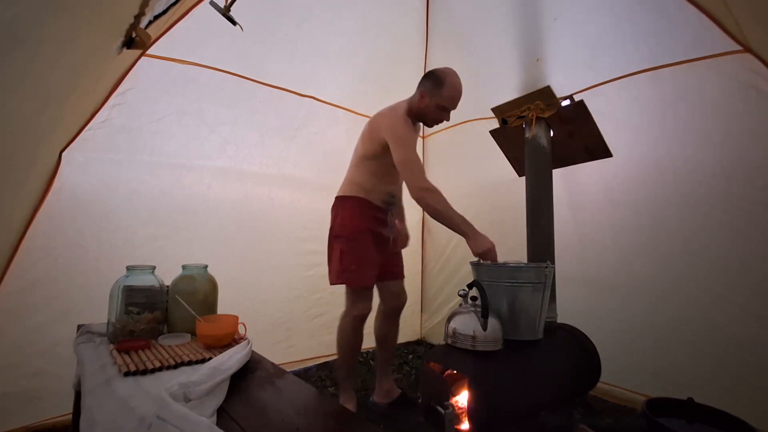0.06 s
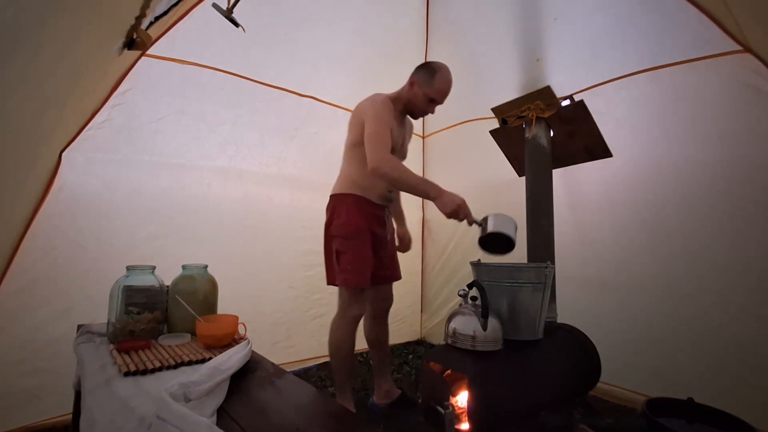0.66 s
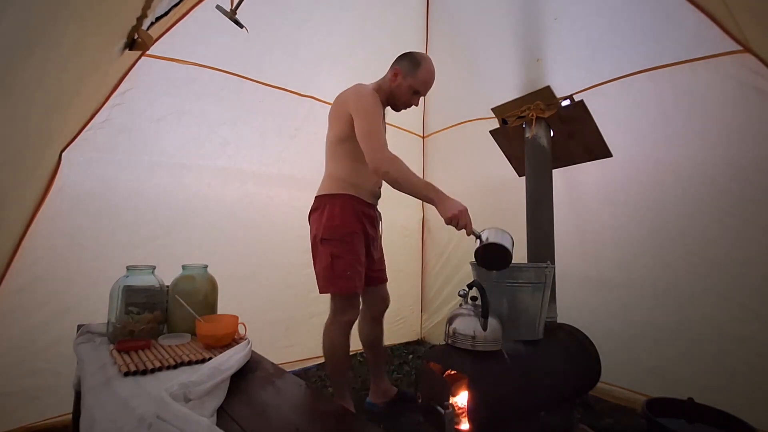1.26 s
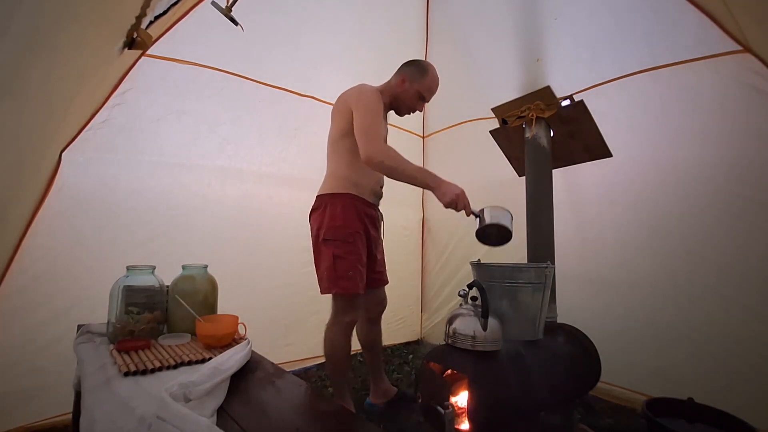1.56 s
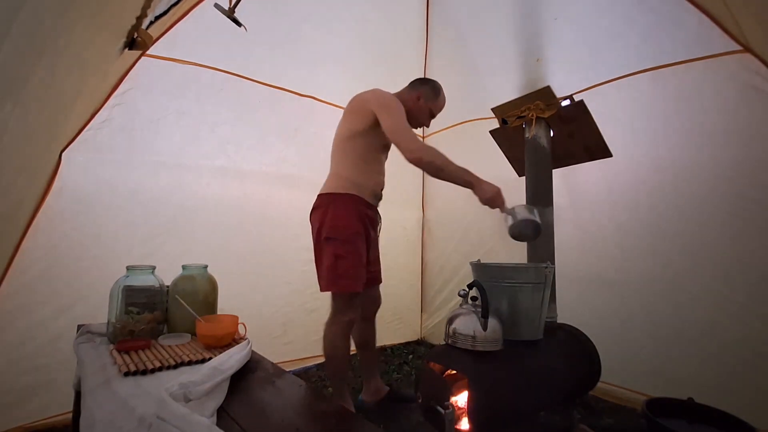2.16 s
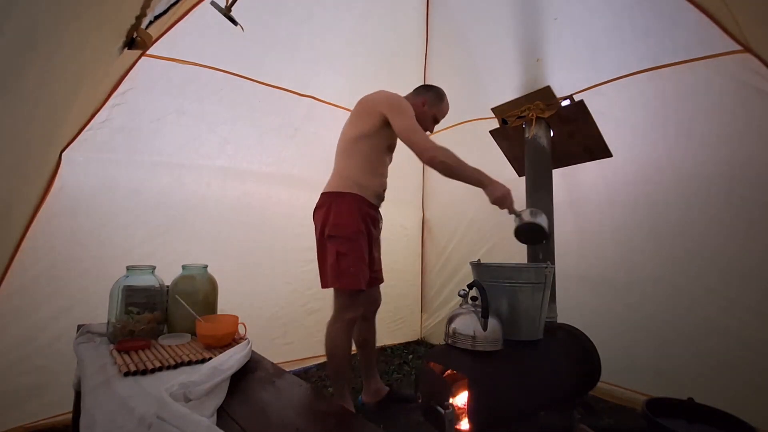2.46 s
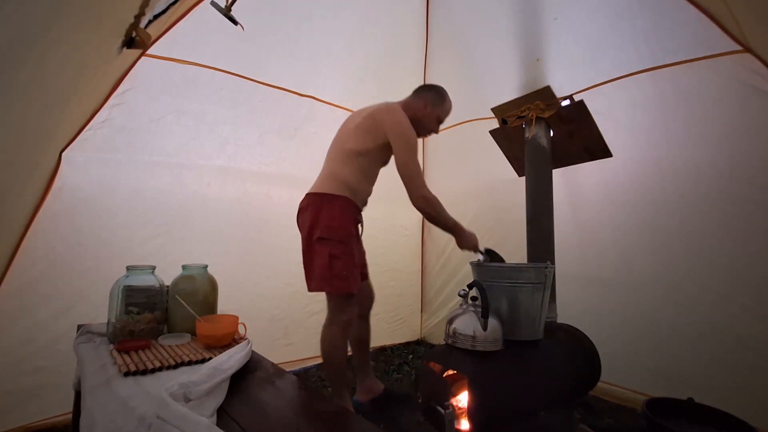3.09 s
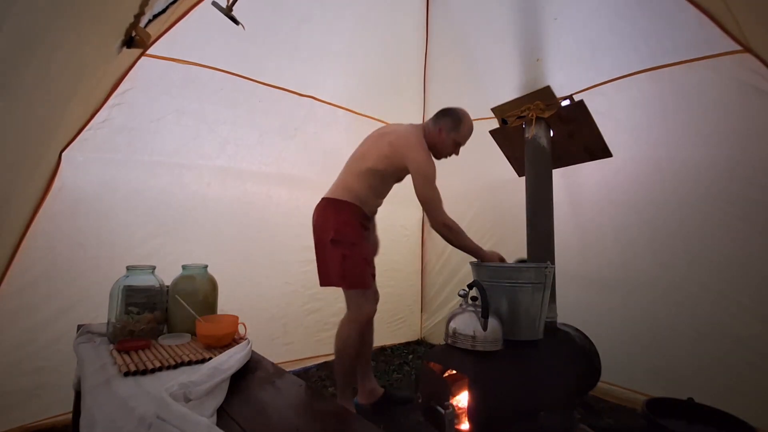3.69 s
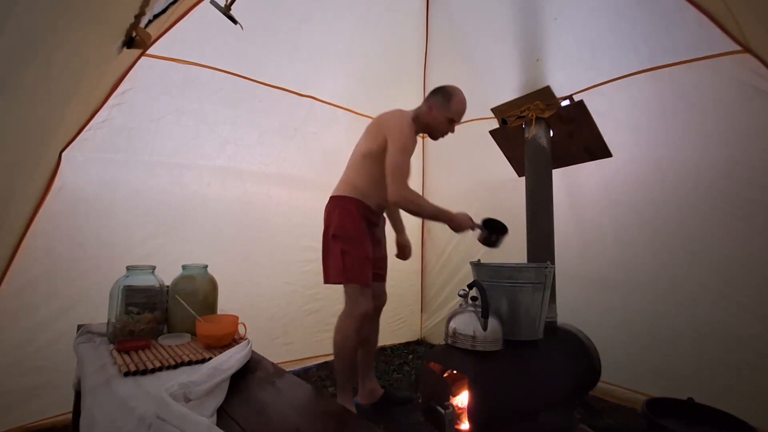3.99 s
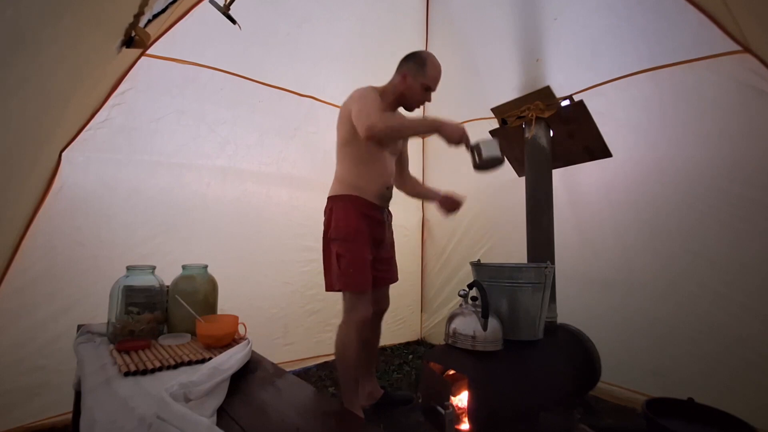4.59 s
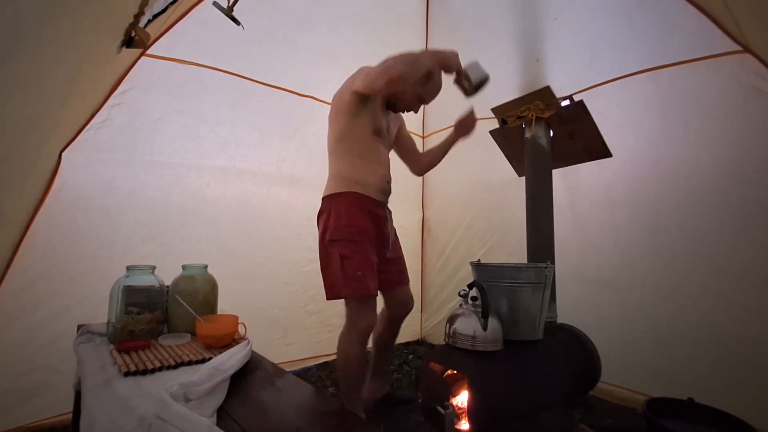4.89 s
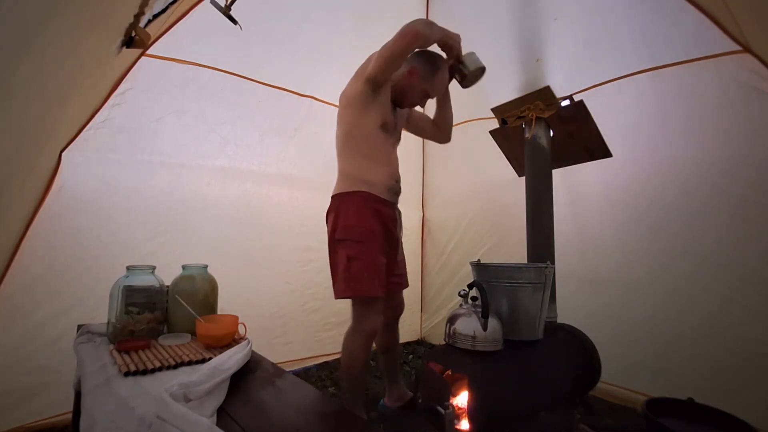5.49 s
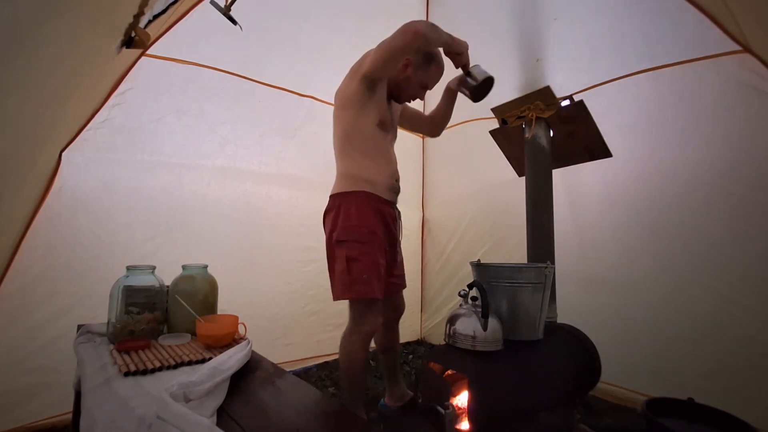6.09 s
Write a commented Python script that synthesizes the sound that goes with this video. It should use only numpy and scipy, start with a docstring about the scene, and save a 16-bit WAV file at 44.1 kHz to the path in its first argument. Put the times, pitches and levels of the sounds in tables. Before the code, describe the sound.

A wood fire drones and flutters low in a stove flue throughout, inside a tent with almost no echo. At the start a ladle glugs softly in a bucket, and drips tick until 0.5 seconds. Water touches the hot steel at about 0.9 seconds and flares at 1.2 into a loud, frying hiss that eases after 1.8, leaving beads finely crackling. A softer hiss builds from 2 seconds, with a very faint wavering steam note beneath it. At 2.6 a sharp splash crackles, drums briefly on the metal and spits until about 2.9. The third pour swells at 3.5 seconds into a bright, full hiss, holds until just past 4, then fades slowly to a thin sizzle. From 5.6 to 6.2 seconds, poured water plops and splats softly on the wet floor. The hiss is wide and leans right, while the rumble stays central.

```python
"""Water flashes into steam on a hot barrel stove, ladled on in three spills inside a sauna tent.
Tiny bursting droplets make a fine hiss; where the water lies deep it fries and boils more coarsely.
Slops drum on the steel, trapped steam spits and stray beads skitter. Underneath, the fire drones in
the flue. The ladle glugs and drips at the start; at the end water splashes softly over the bather."""
import sys
import numpy as np
from scipy import signal
from scipy.fft import rfft, irfft, next_fast_len
from scipy.io import wavfile
from scipy.ndimage import uniform_filter1d

SR = 44100
rng = np.random.default_rng(int(sys.argv[2]) if len(sys.argv) > 2 else 0)


def unload_audio(sound):
    """Save the sound as a 16-bit wav file, at the path given as the first command line argument."""
    columns = np.transpose(np.atleast_2d(sound))
    # keep every value between -1 and 1, then stretch to whole-number steps
    steps = np.round(np.clip(columns, -1, 1) * 32767)
    wavfile.write(sys.argv[1], SR, steps.astype(np.int16))


N = 279902
TIME = np.arange(N) / SR
FFT_SIZE = next_fast_len(N, real=True)
BIN_HZ = np.maximum(np.fft.rfftfreq(FFT_SIZE, 1 / SR), 1)

# tone of fine spray, for the first two spills and the drips: freq_hz, gain_db
HISS_EQ = [(1500, -20), (3000, -47), (5000, -34), (6200, -7.5), (7700, 0.5), (9000, -2), (10500, 0.5),
           (12000, 5.5), (13500, 5), (15800, 1.5)]
# tone of frying water, for the first two spills and the slops: freq_hz, gain_db
FRY_EQ = [(1200, -23), (2200, -5.5), (2600, 1.5), (2950, -3), (3500, 6.5), (3950, 5.5), (4700, 4),
          (5500, 5.5), (6200, -1), (7200, 4), (12000, -1)]


def spills(crossfade_at_s=3.62, crossfade_s=0.13):
    """Two spills sizzle on one patch of the stove; the third wets another, with its own colour."""
    # boiling on the first patch: freq_hz, gain_db
    boil_eq = [(60, 4), (160, 3), (330, -17), (480, 3.5), (620, 6.5), (800, 1.5), (1050, -2.5), (1400, 6.5),
               (1700, 1.5), (2000, -3.5), (2600, -6), (4000, -10)]
    # hiss, frying and boiling of the third spill: freq_hz, gain_db
    third_hiss_eq = [(1500, -52), (3000, -67), (5000, -5.5), (6500, -8), (8000, 4), (9200, 3), (10600, 5),
                     (11900, 9), (13200, 6.5), (14200, 9), (15800, 4.5)]
    third_fry_eq = [(1200, -47), (2100, -30), (2600, -14), (2900, -11), (3500, -5), (4300, 1.5),
                    (5300, -2.5), (6000, -5), (8000, 1.5), (12000, -27)]
    third_boil_eq = [(150, 1.5), (350, -9.5), (600, 1), (1050, -11.5), (1280, -1.5), (1600, -1.5),
                     (1900, -6), (2600, -1.5), (4000, -21)]
    first_two = sizzle(HISS_EQ, FRY_EQ, boil_eq)
    third = sizzle(third_hiss_eq, third_fry_eq, third_boil_eq)
    blend = np.clip((TIME - crossfade_at_s) / crossfade_s + .5, 0, 1)
    return np.sqrt(1 - blend) * first_two + np.sqrt(blend) * third


def sizzle(hiss_eq, fry_eq, boil_eq):
    """Thin water hisses, deeper water fries and boils; more water means more bursts a second."""
    hiss_db, fry_db, boil_db = wetting()
    pops_per_s = 12000 * undb(.6 * (hiss_db + 30.5))
    sputter_db = 0.2 * wander(25) + 0.2 * wander(140)
    fine_pops = unit(pops(pops_per_s, 3.3) + undb(5.5) * noise())
    hiss = undb(hiss_db) * colour(fine_pops, hiss_eq)
    coarse_pops = unit(pops(pops_per_s / 2, 1.65, spots=3) + undb(-8) * noise())
    fry = undb(fry_db) * colour(coarse_pops, fry_eq)
    boil = undb(boil_db) * colour(pops(pops_per_s / 2, 2.36), boil_eq)
    return undb(sputter_db) * (hiss + fry + boil)


def wetting(spread_s=0.2, film_db=-14.5, film_drying_db_per_s=3):
    """Hiss, fry and boil levels in dB: each gush rises, holds, then dries down to a lingering film."""
    # gushes onto the steel: start_s, rise_s, length_s, hiss_db, drying_db_per_s,
    # fry_offset_db, boil_offset_db
    gushes = [(0.872, 0.06, 0.29, -43.5, 24, -14.5, -20), (1.192, 0.06, 0.54, -29, 34, -8, -15.5),
              (1.202, 0.02, 0.04, -42.5, 38, -17.5, -6.5), (1.325, 0.1, 0.19, -34.5, 40, -1, -8),
              (1.99, 0.27, 0.99, -42, 37, -7, -17.5), (2.622, 0.028, 0.2, -32, 24.5, -7.5, -17.5),
              (3.52, 0.22, 0.54, -27, 13, -11, -23.5), (3.654, 0.12, 0.026, -39, 37, -0.5, -6)]
    power = np.full((3, N), 1e-12)
    for start_s, rise_s, length_s, hiss_db, drying_db_per_s, fry_offset_db, boil_offset_db in gushes:
        age = np.maximum(TIME - start_s, 0)
        since_end = np.maximum(age - length_s, 0)
        film = undb(film_db - film_drying_db_per_s * since_end)
        water = np.minimum(age / rise_s, 1) * np.hypot(undb(-drying_db_per_s * since_end), film)
        # fresh water lies deep: less hiss, more frying and boiling until it spreads thin
        fresh = np.exp(-age / spread_s)
        offsets_db = np.array([-6.5 * fresh, fry_offset_db + 3 * fresh, boil_offset_db + 4 * fresh])
        power += (water * undb(hiss_db + offsets_db)) ** 2
    return 10 * np.log10(power)


def slops():
    """A slop flashes into a dense crackle, fries for an instant and drums on the steel shell."""
    # water hitting the steel: start_s, flash_db, decay_s, drum_offset_db, fry_offset_db
    hits = [(2.607, -18.5, 0.018, -6, -4.5), (2.618, -30, 0.17, -16.5, -3), (2.635, -40, 0.017, -5, -3),
            (2.668, -26.5, 0.012, -7, -5), (2.68, -31, 0.023, -14, -2), (2.72, -26.5, 0.005, -15, 0.5),
            (2.752, -42, 0.025, -5, 0)]
    # tone of the flash into steam: freq_hz, gain_db
    flash_eq = [(300, -25), (500, -4), (1000, 0), (2100, -35), (3300, -15), (5000, -10), (6500, -14),
                (7900, 11), (9600, 4.5), (12600, 12.5), (16000, 6)]
    # resonances of the shell: pitch_hz, width_hz, gain_db
    steel_modes = [(1280, 55, -2), (1456, 60, 4), (1535, 60, 4.5), (1658, 55, 5), (1781, 45, 3.5),
                   (1870, 60, -3), (2360, 210, -14)]
    flash = drum = fry = 0
    for start_s, flash_db, decay_s, drum_offset_db, fry_offset_db in hits:
        hit = undb(flash_db) * burst(start_s, decay_s, rise_s=0.0014)
        flash += hit
        drum += undb(drum_offset_db) * hit
        fry += undb(fry_offset_db) * hit
    crackle = colour(flash * pops(20000, 1.5), flash_eq)
    return crackle + colour(fry * noise(), FRY_EQ) + ring(drum * noise(), steel_modes)


def spits():
    """Trapped steam spits in short rasps, each through a gap of its own pitch, over a low sputter."""
    # escapes of steam: start_s, pitch_hz, width_hz, level_db, decay_s
    escapes = [(1.216, 3820, 2220, -37.5, 0.066), (1.235, 6800, 3000, -31, 0.008),
               (2.645, 2580, 700, -34, 0.04), (2.662, 560, 260, -45, 0.019),
               (2.723, 4970, 900, -28.5, 0.024), (2.742, 4840, 1100, -47, 0.035),
               (2.752, 630, 382, -41, 0.035), (2.778, 4220, 867, -25, 0.0045),
               (2.799, 3340, 300, -27.5, 0.013), (2.805, 4570, 900, -34, 0.016),
               (2.865, 660, 200, -45.5, 0.034), (3.764, 1290, 200, -41, 0.024),
               (3.99, 1330, 300, -41.5, 0.013)]
    rasps = sputter = 0
    crackle = pops(8000, 2.7, spots=3)
    for start_s, pitch_hz, width_hz, level_db, decay_s in escapes:
        puff = undb(level_db) * burst(start_s, decay_s, rise_s=.002) * crackle
        rasps += ring(puff, [(pitch_hz, width_hz, 0)])
        sputter += puff
    return rasps + undb(-19) * ring(sputter, [(680, 290, 0)])


def beads(start_s=1.147, rise_s=0.078, level_db=-44, drying_db_per_s=1.3):
    """Beads left by the first spill skitter on the steel with a fine crackle, slowly drying."""
    # tone of the crackle: freq_hz, gain_db
    bead_eq = [(1500, -8), (2050, -4), (2350, -2), (2680, 8), (2980, -3), (3300, 2.5), (3900, 5),
               (4700, -37), (5400, 0.5), (6300, 3.5), (7600, 1.5), (9000, -2.5), (12000, 3.5), (15800, 2.5)]
    age = np.maximum(TIME - start_s, 0)
    skitter_db = 1.1 * wander(160)
    envelope = undb(level_db - drying_db_per_s * age + skitter_db) * np.minimum(age / rise_s, 1)
    return envelope * colour(pops(4000, 1.4), bead_eq)


def stove(drone_db=-48.5, rumble_db=-55, flutter_db=-54, calming_db_per_s=0.6):
    """Flames flutter and drive the flue's low drone; steam whoomphs and hot pots simmer faintly."""
    # swells (+) and lulls (-) of the low drone and flutter, from the fire's draught and from steam
    # whoomphing after a spill: centre_s, half_width_s, drone_step_db, flutter_step_db
    swells = [(0.232, 0.18, -3.5, 1), (0.55, 0.088, 7, 5.5), (0.68, 0.063, -1.5, 2.5),
              (0.84, 0.07, 5, -0.5), (1.17, 0.2, 1, 5), (1.56, 0.067, 10, 7.5), (2.03, 0.059, -6, 4),
              (2.3, 0.36, 2, 0), (2.89, 0.078, 8.5, 0.5), (4.55, 0.2, -5.5, 0.5), (6.2, 0.2, 1.5, 3)]
    # resonances of the flue: pitch_hz, width_hz, gain_db
    flue_modes = [(45.6, 3.8, 1.5), (61.4, 6.4, 1), (72, 8, -3.5), (93.8, 11.4, 3.5)]
    # tone of the rumble, the flutter and the pots: freq_hz, gain_db
    rumble_eq = [(10, -23), (35, -2.5), (60, 7), (110, -15), (145, -1.5), (180, -7), (280, -12), (400, -15),
                 (800, -34)]
    flutter_eq = [(150, -6.5), (330, -7.5), (500, -0.5), (620, 1), (710, 4), (900, 1.5), (1100, -2.5),
                  (1400, -11.5), (1900, -26), (2400, -42)]
    simmer_eq = [(1500, 0.5), (2400, -21), (3100, 3.5), (3500, 0), (4300, 0), (5300, -3.5), (6600, -2),
                 (7400, 6), (8800, -3.5), (10200, -1), (15000, -15)]
    drone_ride_db = -0.15 * wander(11)
    flutter_ride_db = -calming_db_per_s * TIME
    for centre_s, half_width_s, drone_step_db, flutter_step_db in swells:
        swell = np.exp(-((TIME - centre_s) / half_width_s) ** 2)
        drone_ride_db += drone_step_db * swell
        flutter_ride_db += flutter_step_db * swell
    draught = colour(noise(), [(20, 3), (45, 6.5), (100, 5), (200, -3.5)])
    drone = undb(drone_db + drone_ride_db) * unit(ring(draught, flue_modes))
    rumble = undb(rumble_db + 0.43 * drone_ride_db) * colour(noise(), rumble_eq)
    flutter = undb(flutter_db + flutter_ride_db + 0.5 * wander(60)) * colour(noise(), flutter_eq)
    simmer = undb(-58.5 + 0.5 * wander(4.6)) * colour(pops(9000, 3.2), simmer_eq)
    return drone + rumble + flutter + simmer


def steam_tone(pitch_hz=457, level_db=-59, start_s=1.88, end_s=3.5):
    """A faint, wavering note sings from the wet stove and stops just before the third spill."""
    fade = np.clip((TIME - start_s) / .3, 0, 1) * np.clip((end_s - TIME) / .1, 0, 1)
    note = sine(pitch_hz * (1 + .012 * wander(70)))
    mid_side = np.array([[1], [.4]])
    return mid_side * fade * undb(level_db + 2 * wander(8.1)) * note


def ladle():
    """Air pockets glug as the ladle dips and as its water lands; drips tick back into the bucket."""
    # glugging air: start_s, pitch_hz, glide_octaves_per_s, level_db, length_s
    air_pockets = [(-0.006, 790, 17, -41, 0.027), (0.018, 1123, -11, -36, 0.05),
                   (0.025, 1365, -3, -42, 0.064), (5.865, 967, 0, -50.5, 0.085),
                   (6.06, 1750, -0.5, -55, 0.066), (6.077, 1017, -0.5, -48, 0.026)]
    # drips at the bucket: start_s, splat_db, spray_db, decay_s
    drops = [(-0.005, -48, -59, 0.052), (0.022, -43, -67, 0.0059), (0.157, -54, -57, 0.053),
             (0.198, -54, -40.5, 0.0073), (0.238, -66, -59, .02), (0.362, -54, -48, .006),
             (0.40, -74, -54, 0.032), (0.435, -49, -55, 0.0097)]
    # tone of a drip's dull splat: freq_hz, gain_db
    splat_eq = [(800, 2), (1600, 8.5), (2300, -5), (3200, 2), (4400, 3), (5200, -2), (6000, 0), (7500, -1),
                (10000, -8), (16000, -29)]
    glugs = splat = spray = 0
    for start_s, pitch_hz, glide, level_db, length_s in air_pockets:
        age = np.clip(TIME - start_s, 0, length_s)
        waver = 1 + .008 * wander(400)
        envelope = undb(level_db + wander(300)) * np.sin(np.pi * age / length_s)
        glugs += envelope * sine(pitch_hz * waver * 2 ** (glide * age))
    for start_s, splat_db, spray_db, decay_s in drops:
        envelope = burst(start_s, decay_s, rise_s=.001)
        splat += undb(splat_db) * envelope
        spray += undb(spray_db) * envelope
    drips = colour(splat * noise(), splat_eq) + colour(spray * noise(), HISS_EQ)
    mid_side = np.array([[1.2], [.7]])
    return mid_side * glugs + undb(-12) * tent(glugs) + drips


def splashes():
    """Poured water runs off the bather, plops dully and splats on the wet floor."""
    # water landing: start_s, level_db, decay_s
    landings = [(5.608, -52, 0.051), (5.849, -43.5, 0.028), (5.885, -48, 0.015), (6.07, -45, 0.02),
                (6.128, -52, 0.022)]
    # resonances of the puddle: pitch_hz, width_hz, gain_db
    puddle_modes = [(650, 200, 27), (770, 120, -13), (910, 70, 1), (1340, 110, -29), (1710, 80, -5)]
    envelope = sum(undb(level_db) * burst(start_s, decay_s, rise_s=0.0064)
                   for start_s, level_db, decay_s in landings)
    plops = ring(envelope * noise(), puddle_modes)
    splats = ring(envelope * pops(1500, 2.5, spots=2), [(1400, 630, 0)])
    return plops + undb(-9) * splats


def tent(x, t60_s=0.053, wet_db=1):
    """Mid and side from one spot: the direct sound, then short scatter off the fabric walls."""
    t = TIME[:SR // 10]
    paths = rng.standard_normal((2, len(t))) * undb(-60 * t / t60_s)
    paths *= undb(wet_db) / np.sqrt(np.sum(paths ** 2, axis=1, keepdims=True))
    paths[[0, 1], rng.integers(0, 16, size=2)] += 1  # direct sound
    return signal.oaconvolve(x[None], paths, axes=1)[:, :N] / np.sqrt(1 + undb(2 * wet_db))


def pops(per_s, spread_db, spots=5):
    """Droplets burst at several spots in the tent, many tiny and a few large; rms 1."""
    crackle = 0
    for _ in range(spots):
        size = undb(spread_db * np.minimum(rng.exponential(size=N), 6))
        triggers = rng.random(N) < per_s / spots / SR
        polarity = rng.choice([-1, 1], N)
        crackle += tent(triggers * size * polarity / np.sqrt(per_s))
    return unit(crackle)


def noise():
    """Unrelated white noises for mid and side."""
    return rng.standard_normal((2, N))


def sine(pitch_hz):
    """Sine tone that follows a moving pitch."""
    return np.sin(2 * np.pi * np.cumsum(pitch_hz) / SR)


def wander(rate_hz):
    """Smooth random modulation: stepped values, slewed twice."""
    hold = max(int(SR / rate_hz), 2)
    steps = rng.standard_normal(N)[np.arange(N) // hold]
    return 2.63 * uniform_filter1d(uniform_filter1d(steps, hold), hold)


def burst(start_s, decay_s, rise_s):
    """Envelope with a quick rise and an exponential fall."""
    age = np.maximum(TIME - start_s, 0)
    return (1 - np.exp(-age / rise_s)) * np.exp(-age / decay_s)


def curve(points):
    """Draw (freq_hz, value) points across all frequency bins."""
    freq_hz, value = np.transpose(points)
    return np.interp(np.log(BIN_HZ), np.log(freq_hz), value)


def colour(x, eq):
    """Shape a white sound with (freq_hz, gain_db) points, keeping its power."""
    return irfft(rfft(x, FFT_SIZE) * unit(undb(curve(eq))), FFT_SIZE)[..., :N]


def ring(x, modes):
    """Pass a white sound through (pitch_hz, width_hz, gain_db) resonances, keeping its power."""
    response = 0
    for k, (pitch_hz, width_hz, gain_db) in enumerate(modes):
        detuning = (BIN_HZ / pitch_hz - pitch_hz / BIN_HZ) * pitch_hz / width_hz
        response += (-1) ** k * undb(gain_db) / (1 + 1j * detuning)
    return irfft(rfft(x, FFT_SIZE) * unit(response), FFT_SIZE)[..., :N]


def undb(db):
    """Decibels to gain."""
    return 10 ** (np.asarray(db) / 20)


def unit(x):
    """Scale to rms 1."""
    return x / np.sqrt(np.mean(np.abs(x) ** 2))


def scene():
    """The stereo mix: bass nearly mono, treble wide and leaning right, to the stove's side."""
    # likeness of left and right: freq_hz, correlation
    stereo_likeness = [(25, 1), (290, 0.88), (520, 0.85), (720, 0.34), (1000, 0), (1250, -0.32),
                       (1500, -0.14), (1850, 0.33), (2350, -0.5), (2750, -0.26), (3150, -0.34),
                       (3700, -0.4), (4400, 0.2), (5500, 0), (6500, -0.03), (8500, 0.02), (11000, 0)]
    # panning by band: freq_hz, left_minus_right_db
    stereo_balance = [(60, 2), (700, -2), (1100, -2.5), (1450, -8), (2000, 1.5), (2600, -5), (3000, -3),
                      (4500, -2), (7500, -1.5), (9200, -7.5), (10500, -5), (12300, -11), (15000, -3.5)]
    mix = spills() + slops() + spits() + beads() + stove() + steam_tone() + ladle() + splashes()
    mid, side = rfft(mix, FFT_SIZE)
    correlation = np.clip(curve(stereo_likeness), -1, 1)
    mid *= np.sqrt(1 + correlation)
    side *= np.sqrt(1 - correlation)
    pan = undb(np.array([[1], [-1]]) * curve(stereo_balance) / 2)
    pan /= np.sqrt(np.mean(pan ** 2, axis=0))
    return irfft(np.array([mid + side, mid - side]) * pan, FFT_SIZE)[:, :N]


def record(dry):
    """A steep low-pass trims the very top of the hiss."""
    cutoff_hz = 15780
    return signal.sosfilt(signal.ellip(12, .1, 80, cutoff_hz, fs=SR, output="sos"), dry)


dry = scene()
out = record(dry)
unload_audio(out)
```